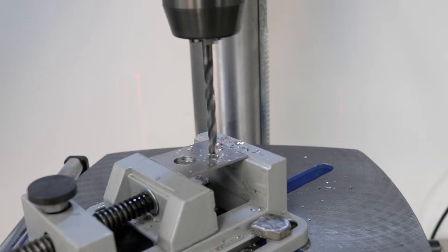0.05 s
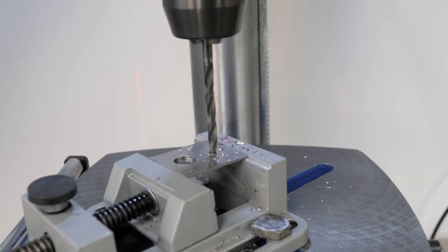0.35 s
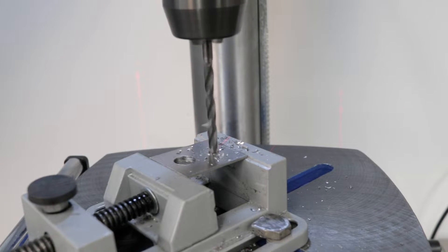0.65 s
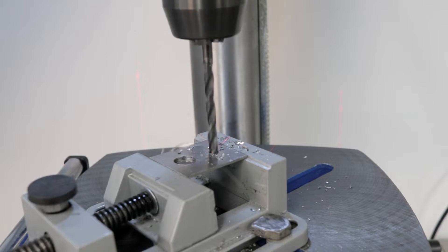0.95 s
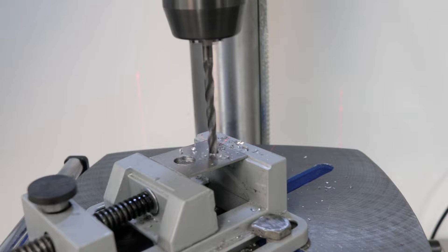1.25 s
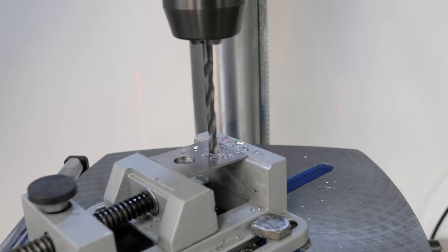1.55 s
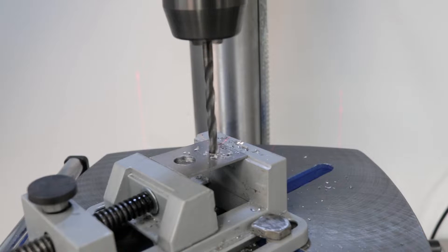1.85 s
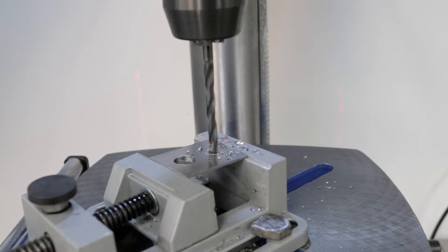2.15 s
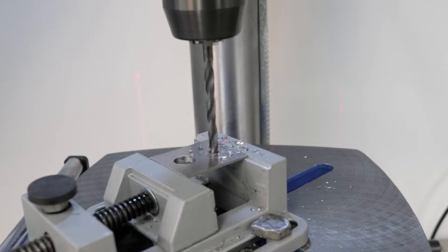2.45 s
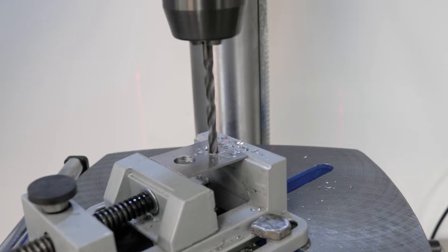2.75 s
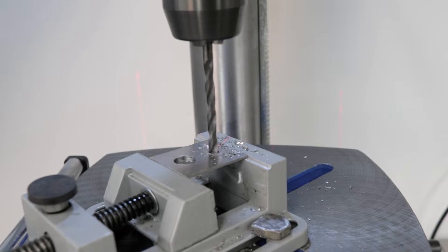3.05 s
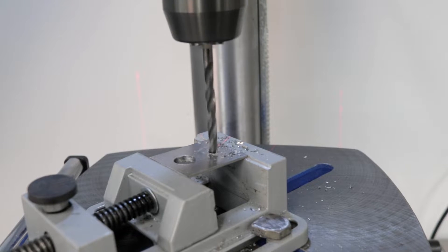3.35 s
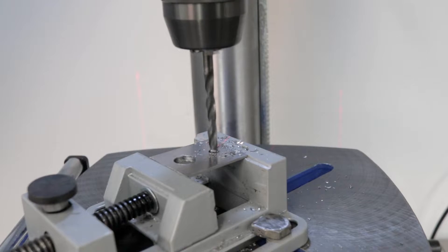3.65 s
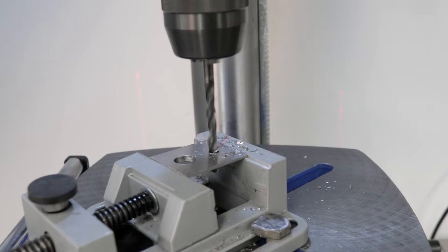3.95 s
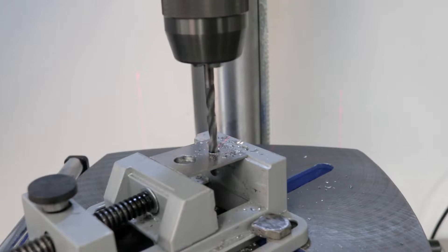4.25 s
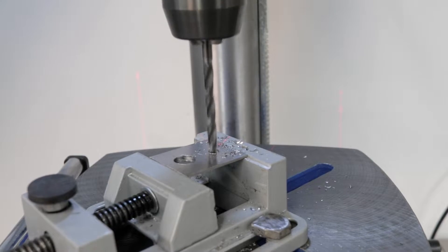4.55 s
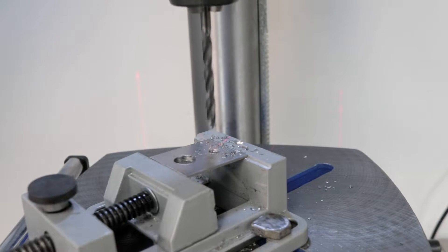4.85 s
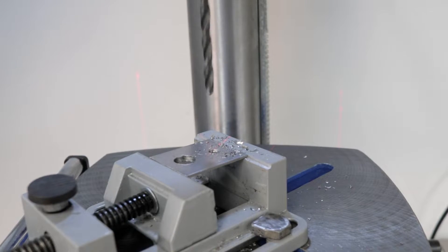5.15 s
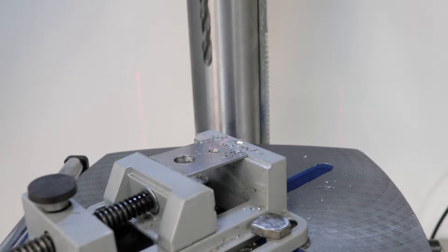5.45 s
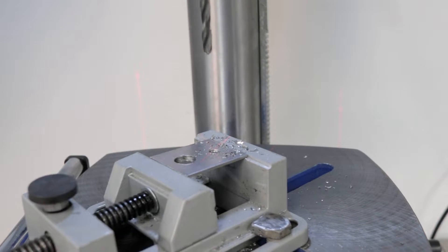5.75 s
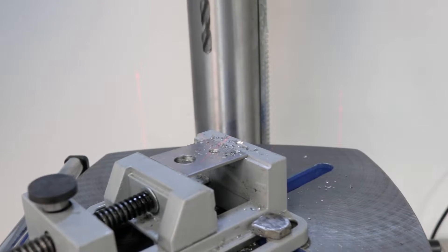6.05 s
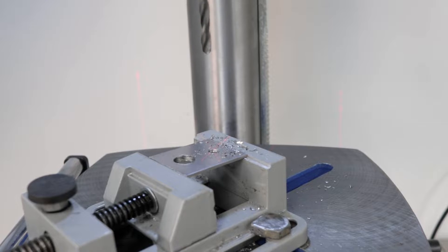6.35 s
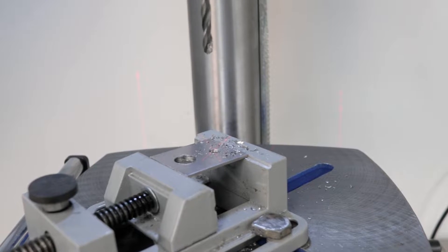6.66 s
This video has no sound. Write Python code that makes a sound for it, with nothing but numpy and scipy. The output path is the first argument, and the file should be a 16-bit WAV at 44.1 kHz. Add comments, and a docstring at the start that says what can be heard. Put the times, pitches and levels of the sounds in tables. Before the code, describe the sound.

In a small workshop, a bench drill runs with a steady hum and a throbbing belt, close to the microphone. The bit ticks lightly on a steel plate, then bites with a harsh, ringing scrape and sharp snaps of breaking chips. The cutting eases into short, high squeaks and stops as the bit lifts out. The motor runs on alone until a switch clacks at the very end.

```python
"""A belt-driven bench drill bores a steel plate in a vice; small workshop, one microphone close by.
Over the hum of the motor and the throb of the belt, the tip ticks and skates on the plate, then bites.
The bit scrapes, shaves flakes and snaps off chips, about one a turn at full feed.
As the feed eases it sticks and slips in the hole, squeaking, and is lifted out.
The motor runs free; at the very end the switch clacks and it starts to run down."""
import sys
import numpy as np
from scipy import signal
from scipy.fft import rfft, irfft
from scipy.io import wavfile
from scipy.ndimage import uniform_filter1d, map_coordinates

SR = 44100
rng = np.random.default_rng(int(sys.argv[2]) if len(sys.argv) > 2 else 0)


def log_audio(samples):
    """Write samples as a 16-bit WAV file to the path given in sys.argv[1]."""
    # one column per channel
    frames = np.atleast_2d(samples).T
    # limit to full scale, then quantise
    limited = np.clip(frames, -1, 1)
    pcm = np.round(limited * 32767).astype(np.int16)
    wavfile.write(sys.argv[1], SR, pcm)


N = 295451
TIME = np.arange(N) / SR
FREQ = np.maximum(np.arange(N // 2 + 1) * SR / N, 1)
SPINDLE_HZ, TOP_HZ = 9.656, 16200
BITE_S, LIP_S = 0.67, 1.727  # the lips first bite; one moment at which a lip passes
EASE_S = (3.35, 3.72)  # over this span the tip stops cutting

# strength of the scrape: t/s, level/dB
SCRAPE_LEVEL = [(0, -61.5), (.4, -61.5), (.55, -55.5), (.7, -52), (1.0, -48), (1.17, -41), (1.6, -41),
                (2.35, -42.5), (2.52, -40), (2.68, -43.5), (2.93, -39), (3.2, -47.5), (3.4, -46),
                (3.6, -42.5), (3.8, -46), (4.0, -53.5), (4.45, -45), (4.6, -47.5), (4.67, -53), (4.71, -57),
                (4.85, -67)]
# pressure on the feed lever: t/s, pressure/0-1
FEED = [(0, 0.52), (.6, 0.03), (1.1, 0.84), (1.6, 0.93), (2.9, 1), (3.3, 1), (3.72, 0.27), (4.8, 0.01)]
# modes of the bit with its tip engaged: f/Hz, width/Hz, gain/dB
TIP_MODES = [(2367, 60, 5.5), (2530, 70, 5), (2831, 75, 5.5), (3332, 32, 2.5), (3696, 120, 4.5),
             (3913, 34, 7.5), (4220, 50, 2.5), (4596, 140, -0.5), (5670, 50, -5), (6150, 120, 3),
             (6440, 60, -6), (6980, 120, -1), (7420, 92, -1), (9630, 130, -4), (9920, 200, 1),
             (11370, 80, -1.5), (11900, 300, -14)]
# the same with a loose flake ringing in the flute
FLAKE_MODES = TIP_MODES + [(7240, 500, 3.5)]
# modes of the bit with its tip free and its flanks rubbing: f/Hz, width/Hz, gain/dB
FLANK_MODES = [(2378, 49, -6), (2710, 52, -9.5), (2863, 70, -6), (3300, 100, -12.5), (4235, 130, -7.5),
               (4670, 110, -11.5), (5200, 90, -12.5), (6015, 60, -6), (6500, 130, -3.5), (7400, 89, -1.5),
               (8950, 160, -10.5), (9600, 300, -14.5), (10400, 200, -14), (11100, 170, -6.5),
               (12150, 100, -13), (12950, 120, -17.5)]
# spectrum of tearing steel: f/Hz, gain/dB
TEAR_SPECTRUM = [(100, -47.5), (450, 5), (1100, -6), (1630, -1.5), (2050, -6), (2700, -2.5), (3750, -1),
                 (5400, -3.5), (7200, 0), (8700, -5.5), (9900, -5), (12300, -5), (13500, -11), (15000, -14),
                 (16500, -28)]


def scraping(hush_s=(4.46, 4.8), lift_s=(4.695, 4.8)):
    """The lips tear the steel without pause; with less feed the flanks take over and only rub."""
    # pitch at which the flutes sing in the hole: t/s, f/Hz
    flute_pitch = [(3.7, 5150), (3.92, 4780), (4.14, 4550), (4.25, 4400), (4.35, 4250), (4.46, 4370)]
    # treble of the scrape against its body: t/s, level/dB
    treble_level = [(0, -1.5), (.6, -5.5), (1.6, -9), (2.3, -15), (2.9, -9), (3.25, -22), (3.42, -17),
                    (3.56, -14), (3.85, -5.5), (4.05, -16), (4.6, -16)]
    rub = ramp(EASE_S)
    grit = crackle(spread_db=2.5)
    sing = walk(500) * np.sin(2 * np.pi * np.cumsum(curve(flute_pitch) + 120 * walk(300)) / SR)
    flanks = shape(grit, resonances(FLANK_MODES)) + undb(-6.5) * sing * (1 - ramp(hush_s))
    tip = shape(grit, resonances(TIP_MODES))
    ring = ((1 - rub) * tip + rub * flanks) / np.hypot(1 - rub, rub)
    ring = sway(ring, share=.009, rate=45)  # the turning contact keeps retuning the bit
    rasp = shape(crackle(spread_db=7), heavy_cut(plate_db=1))
    tearing = undb(-14 + 17 * curve(FEED))
    bite = undb(2.4 * walk(70) + 0.81 * walk(400))  # the lips grip and let go unevenly
    body, treble = split(bite * (ring + tearing * rasp) / np.hypot(1, tearing), hz=7600)
    scrape = unit(body) + unit(treble) * undb(curve(treble_level))
    frame = resonances([(123, 14, 1), (141, 15, -0.5), (165, 18, -11)])
    rumble = shape(rng.standard_normal(N), frame, size=8192)
    rumble *= (1 - rub) * undb(-18.5) + rub * undb(-26.5)
    return (1 - ramp(lift_s)) * undb(curve(SCRAPE_LEVEL)) * (scrape + rumble)


def ticks_and_chips(spread_db=6, hard_db=-36, crack_s=0.00056):
    """Light ringing ticks as the tip first touches the plate; once it bites, chips tear or snap off."""
    # first-contact ticks, then chips breaking: t/s, level/dB, treble tilt/dB, decay/s, snap/0-1
    pulses = [(0.082, -53, -2, .005, .1), (0.219, -57, -11, .005, .1), (0.318, -56.5, -2, 0.0042, .1),
              (0.395, -52, 10, 0.0044, .1), (0.4439, -43, 8, 0.0061, 0.2), (0.49, -46, -2, 0.0051, 0.2),
              (0.59, -48.5, -6, 0.0067, .1), (0.626, -47, -3, 0.0038, .1), (0.6578, -42.5, 4, 0.0033, 0.3),
              (0.691, -41, -6, 0.0072, 0.2), (0.787, -49, -11, 0.0059, .1), (0.8957, -37.5, -5.5, 0.002, 0),
              (0.9666, -38, 0.5, 0.0043, .3), (0.9974, -33, -1.5, 0.0061, .1), (1.071, -34, 4.5, 0.004, .1),
              (1.102, -29.5, -4, 0.0067, 0.5), (1.1116, -31, 5, 0.003, 0.7), (1.176, -38.5, 0, .004, .2),
              (1.2094, -26.5, 6, 0.0034, 0.54), (1.218, -34, 5.5, 0.0022, .6),
              (1.3159, -25, 4, 0.0029, 0.53), (1.419, -27, 2.5, 0.0026, 0.3), (1.52, -26, 4.5, 0.0026, 0.6),
              (1.5253, -27, 4.5, 0.0028, .7), (1.6205, -29, 3, 0.004, .1), (1.628, -33, 1.5, 0.0016, .8),
              (1.7265, -26.5, 4.5, 0.0017, 0.6), (1.7289, -23.5, 9.5, 0.0023, .8),
              (1.8309, -31.5, 3, 0.0078, 0.77), (1.9376, -28.5, 6, 0.0033, .4),
              (1.9832, -32, -0.5, 0.0038, 0.6), (2.0899, -27, 9.5, 0.0011, 1), (2.0949, -33, 5, 0.0012, .8),
              (2.1026, -28, 6.5, 0.001, .8), (2.142, -28.5, 2, 0.0062, 0.36),
              (2.3013, -42.5, 13.5, 0.0027, 0.4), (2.35, -41, 7.5, 0.0036, .1),
              (2.4427, -33.5, 13.5, 0.0013, .8), (2.4492, -26.5, 6.5, 0.003, .9),
              (2.4564, -28, 5.5, 0.0027, .6), (2.5005, -29.5, 5.5, 0.0018, 0.9), (2.505, -30, 5, 0.002, .7),
              (2.617, -34.5, 2, 0.0037, 0.2), (2.66, -38.5, -6, 0.0041, 0.25),
              (2.707, -42.5, 4.5, 0.0026, 0.3), (2.746, -23.5, 8, 0.0046, 0.5),
              (2.863, -25, 9, 0.0019, 0.9), (2.9325, -36, 17, 0.002, 1), (2.965, -35, -5, 0.0024, .1),
              (3.018, -35.5, -3, 0.0054, 0.64), (3.039, -47, 4, 0.0026, .5), (3.0642, -37, 3, 0.0033, .4),
              (3.0882, -37, 2, 0.0025, .7), (3.1193, -38, -2, 0.0059, 0.4), (3.1907, -43, 3, 0.0028, .2),
              (3.2287, -35.5, -4.5, 0.0049, 0.3), (3.3284, -29, 4.5, 0.0044, 0.38),
              (3.4442, -39.5, -9, 0.0043, 0.1), (3.4781, -31.5, 0, 0.0072, 0.1),
              (3.5033, -36, 12, 0.0023, .6), (3.53, -39, 1, 0.0038, .3), (3.58, -38.5, 12, 0.0048, 0.2),
              (3.6, -39, 2, 0.0044, .2), (4.0826, -40, 7, 0.0032, 0.64)]
    light, hard = np.zeros((2, N))
    for s, db, tilt_db, decay, snap in pulses:
        volley = burst(decay, spread_db, rise=decay * (1 - snap))
        crack = snap * burst(crack_s, spread_db)
        low, high = split((volley + crack) / np.hypot(1, snap / 2), hz=6000)
        tilt = undb(tilt_db)
        blow = undb(db) * (low + tilt * high) / np.hypot(1, tilt)
        hard_share = 1 / (1 + undb(hard_db - db))  # light blows ring the bit, hard ones crack broadly
        add(light, s, (1 - hard_share) * blow)
        add(hard, s, hard_share * blow)
    hard = split(hard, hz=950)[1]  # the blows are too small to shake the frame
    ring = shape(light, resonances(FLAKE_MODES)) + shape(hard, heavy_cut(plate_db=3.5))
    return sway(ring, share=.006, rate=30)  # no two blows meet the bit at the same spot


def heavy_cut(plate_db):
    """Gain at every frequency of a deep cut: broad tearing plus the ring of plate and bit."""
    # plate, vice and bit ringing together under heavy feed: f/Hz, width/Hz, gain/dB
    plate_modes = [(1584, 40, 5), (1682, 36, 7.5), (2400, 90, -2.5), (2880, 140, 0), (3360, 60, -3),
                   (3670, 120, 3.5), (3925, 60, 5), (4630, 90, -2), (5700, 60, -7), (6120, 80, -2.5),
                   (6410, 55, -5), (6950, 110, 3), (7410, 90, 2), (8350, 130, -5), (9530, 140, -2.5),
                   (9950, 200, -4), (11300, 110, -4), (11850, 230, -4), (12600, 200, -7)]
    return np.hypot(unit(colour(TEAR_SPECTRUM)), undb(plate_db) * unit(resonances(plate_modes)))


def flakes(jitter_s=0.0043):
    """Each of the two lips shaves off a flake once a turn; they stand out most under light feed."""
    level_db = curve(SCRAPE_LEVEL) - 1 - 5.5 * curve(FEED)
    half_turn_s = .5 / SPINDLE_HZ
    passes = np.arange(LIP_S % half_turn_s, EASE_S[1], half_turn_s)
    blows = np.zeros(N)
    for s, (late, softer_db) in zip(passes, rng.standard_normal((len(passes), 2))):
        if s > BITE_S:
            flake = burst(decay=0.0046, spread_db=5, rise=.002)
            add(blows, s + jitter_s * late, undb(level_db[int(s * SR)] - softer_db) * flake)
    return sway(shape(blows, resonances(FLAKE_MODES)), share=.005, rate=25)


def crumbs(per_s=20, spread_db=4):
    """Tiny crumbs break off at random between the chips, as strong as the cut is deep."""
    level_db = curve(SCRAPE_LEVEL) - 10
    blows = np.zeros(N)
    gaps, sizes = rng.random((400, 2)).T
    for s, size in zip(np.cumsum(-np.log(gaps)) / per_s, 2 * sizes - 1):
        if s < EASE_S[1]:
            crumb = burst(decay=0.0023, spread_db=5.6)
            add(blows, s, undb(level_db[int(s * SR)] + spread_db * size) * crumb)
    return shape(blows, resonances(FLAKE_MODES))


def squeaks(wobble=0.15, stutter_db=7, flute_hz=4100):
    """The bit sticks and slips in short chirps; the rough ones wobble in pitch, stutter and rasp."""
    # slips in the hole: t/s, level/dB, f/Hz, length/s, roughness/0-1, glide/octaves
    slips = [(3.314, -51, 467, 0.096, 0.42, 0.23), (3.47, -44.5, 584, 0.028, 0.32, 0.15),
             (3.503, -47, 618, 0.07, 0.53, 0.15), (3.485, -41.5, 1597, 0.065, 0.25, 0.02),
             (2.755, -45.5, 12500, .07, .3, 0), (3.578, -39, 10200, .009, .1, 0),
             (3.652, -38, 7380, .008, 0.1, 0.1), (3.6826, -22.5, 6740, 0.0052, 0.2, -0.02),
             (3.689, -32, 6640, 0.0049, 0.2, 0.064), (3.709, -40.5, 4766, 0.016, 0.65, -0.013),
             (3.714, -35, 6200, 0.009, 0.4, -0.2), (3.762, -43, 4300, 0.0078, 0, 0.061),
             (3.81, -38, 5200, 0.012, 0.04, 0.12), (3.816, -37, 5690, 0.015, 0.3, 0.16),
             (3.82, -30.5, 6390, 0.01, 0.42, 0.12), (3.918, -37.5, 4840, 0.0087, 0.22, 0.2),
             (4.029, -43, 4520, 0.0089, 0.16, 0.18), (4.038, -33.5, 6780, 0.0084, 0.42, 0.093),
             (4.084, -47, 1464, 0.013, 0.18, 0.082), (4.134, -35, 4570, 0.021, 0.24, 0.013),
             (4.188, -46, 1520, 0.019, 0.2, 0.017), (4.238, -35, 3800, 0.0083, 0.2, 0.097),
             (4.241, -33, 3930, 0.011, 0.3, 0.05), (4.245, -36.5, 12100, 0.012, 0.15, 0.016),
             (4.338, -33, 3740, 0.0074, 0.1, 0.026), (4.343, -32, 3970, 0.011, 0.42, 0.11),
             (4.344, -48.5, 1230, 0.041, 0.23, 0.028), (4.373, -39, 7000, 0.0043, 0, 0.0042),
             (4.389, -38.5, 6100, 0.0068, 0.2, -0.1), (4.390, -37, 2383, 0.015, 0.03, -0.059),
             (4.437, -34.5, 4440, 0.007, 0.32, 0.037), (4.442, -36.5, 4130, 0.014, 0.71, 0.0022),
             (4.45, -34, 6800, 0.0053, 0.1, 0.35), (4.508, -25, 6540, 0.0042, 0.09, 0.11),
             (4.534, -40, 2677, 0.014, 0.45, -0.22), (4.535, -37, 7130, 0.0091, 0.38, 0.091),
             (4.574, -39, 7220, 0.0086, .15, .08), (4.595, -37, 6590, 0.01, 0.05, -0.078),
             (4.616, -47, 2600, 0.014, 0.33, -0.3), (4.644, -41, 7020, 0.0074, 0.37, .15),
             (4.661, -41, 6950, 0.0059, 0, -0.16), (4.663, -46, 2420, 0.0096, 0, -0.12)]
    squeal, grit = np.zeros((2, N))
    for s, db, hz, length, rough, glide in slips:
        count = int(length * SR)
        along = np.linspace(0, 1, count)
        stutter = undb(stutter_db * rough * walk(620, count))
        swell = undb(db) * unit(np.sin(np.pi * along) * stutter)
        pitch = hz * 2 ** (glide * (along - .5)) * (1 + wobble * rough * walk(hz / 2, count))
        phase = 2 * np.pi * np.cumsum(pitch) / SR
        second = np.sin(2 * phase) * (2 * hz < TOP_HZ)
        third = undb(-10) * np.sin(3 * phase) * (3 * hz < TOP_HZ)
        overtone_db = -1 - 23 * abs(np.log2(hz / flute_hz))  # strongest near the pitch of the flutes
        add(squeal, s, swell * (np.sin(phase) + undb(overtone_db) * (second + third)))
        add(grit, s, swell * rough * rng.standard_normal(count))
    rubbing = np.hypot(unit(colour(TEAR_SPECTRUM)) / 2, unit(resonances(FLANK_MODES)))
    squeal += undb(-6) * shape(grit, rubbing)
    return split(squeal, hz=12600)[0]  # the squeaks stop short of the highest treble


def skating():
    """Before the lips bite, the tip skates on the plate and the bit rings, swelling with each turn."""
    # modes of the bit with only its point on the plate: f/Hz, width/Hz, gain/dB
    skate_modes = [(3780, 70, 1), (3340, 38, -20), (5900, 45, -15), (10060, 88, -17)]
    swing_db = walk(31.5) + 2 * np.cos(2 * np.pi * SPINDLE_HZ * (TIME - LIP_S))
    ring = shape(crackle(spread_db=9), resonances(skate_modes))
    return ring * undb(-60 + swing_db) * (1 - ramp((BITE_S / 2, BITE_S)))


def motor(off_s=6.577, home_s=(5.78, 5.97), sag=.005, run_down_per_s=1.28):
    """Hum, whine, belt and bearings follow the load, swell as the quill slides home, then coast."""
    # magnetic hum near multiples of the mains: f/Hz, level/dB
    hum_lines = [(98.9, -26), (50, -38), (202.5, -23), (601, -21.5), (699.5, -8.5), (799.6, -0.5),
                 (901, -15)]
    # rotor slot and bearing tones: f/Hz, level/dB
    whine_lines = [(471.7, -12.5), (490, -7), (595, -14), (743, -6.5), (818.7, -8), (844, -4.5),
                   (867.5, -9), (1043.7, 0), (1143.7, -3.5)]
    # tones that stand out when the motor runs free: f/Hz, level/dB
    idle_lines = [(346.5, 1), (769.8, 3), (943, -1.5), (1346, -16), (1486, -21), (1687.4, -1),
                  (1787.4, -10), (1887.4, -2), (2331, -11), (2433, -17.5)]
    # spectrum of bearing and fan noise: f/Hz, gain/dB
    air_spectrum = [(18, -82.5), (30, -45), (80, -33.5), (120, -21), (160, -25.5), (227, -15), (295, -11),
                    (394, -10), (649, -12), (801, -7.5), (866, -18), (1070, -15.5), (1250, -22),
                    (1860, -24.5), (2120, -30.5), (3980, -45.5), (6380, -41), (16000, -58)]
    # groan of belt and pulleys with the power off: f/Hz at full speed, level/dB
    groan_lines = [(385, -1), (505, 3), (545, -11)]
    load = (1 - ramp(EASE_S)) * (.6 + .4 * curve(FEED))
    home = ramp(home_s)
    coasting_s = np.maximum(TIME - off_s, 0)
    clock = np.cumsum(1 - sag * load - run_down_per_s * coasting_s) / SR  # slows with the shaft
    power = np.exp(-coasting_s / .035)

    def gain(idle_db, load_db, home_db):
        """Gain from the idle level and its changes at full load and with the quill home."""
        return undb(idle_db + load_db * load + home_db * home)

    hum = tones(hum_lines, TIME, waver_db=0, drift=0.095) * undb(0.91 * load * walk(35))
    hum *= gain(idle_db=-52.5, load_db=2, home_db=2)
    whine = tones(whine_lines, clock, waver_db=1.3, drift=0.4) * gain(-59, 0.5, 4)
    idle = tones(idle_lines, clock, waver_db=1.5, drift=0.2) * gain(-64.5, -16, 1.5)
    drone = belt(clock) * gain(-46.5, -4, 1.5) * np.exp(-coasting_s / .09)
    buzz_db = 2 * np.sin(2 * np.pi * 98.9 * TIME) * power  # the casing buzzes with the magnetic pull
    air = shape(bearings(clock), colour(air_spectrum)) * gain(-53.5, 2, 3) * undb(buzz_db + walk(25))
    groan = tones(groan_lines, clock, waver_db=2, drift=.4) * undb(-57) * (1 - power)
    return drone + (hum + whine + idle) * power + groan + air


def belt(clock, lap_hz=7.95, drone_hz=297.5, joint_s=4.05):
    """The belt joint swings the drone once a lap, making sidebands; the frame rings just below it."""
    lap = 2 * np.pi * lap_hz * (clock - np.interp(joint_s, TIME, clock))
    phase = 2 * np.pi * drone_hz * clock
    sidebands_db = {-2: -10, -1: -8.5, 0: 0, 1: -14}
    drone = sum(undb(db) * np.sin(phase + k * lap + 0.55 * walk(5)) for k, db in sidebands_db.items())
    frame = shape(rng.standard_normal(N), resonances([(291.6, 8.7, 0.0051)]), size=8192)
    uneven = undb(1.35 * walk(3.7))
    return unit((unit(drone) + undb(-5) * frame) * uneven)


def bearings(clock, shaft_hz=24.82, size=128):
    """Bearing and fan noise; part of its low range comes round again with every turn of the shaft."""
    low, high = split(rng.standard_normal(N), hz=1500)
    one_turn = rng.standard_normal(size)
    repeat = map_coordinates(one_turn, [clock * shaft_hz * size % size], order=3, mode="grid-wrap")
    return high + undb(-4) * low + undb(-17) * repeat


def clacks():
    """The feed lever knocks faintly, then the switch clacks; both rattle the head casing."""
    # blows of lever and switch: t/s, level/dB, decay/s
    knocks = [(4.952, -78, 0.012), (5.19, -66, .03), (6.537, -56, 0.039), (6.573, -52, 0.0024),
              (6.5761, -39.5, 0.0031), (6.601, -48, 0.074)]
    # modes of the head casing: f/Hz, width/Hz, gain/dB
    casing_modes = [(391.4, 61, 6.5), (474, 54, -1), (730, 77, 4), (1310, 390, -3), (2080, 72, 2),
                    (2540, 330, 0), (3200, 200, 0), (3680, 92, -8), (4188, 190, -12), (5040, 410, -6),
                    (5860, 300, -4), (7600, 390, -4.5), (9700, 1000, -13.5), (12800, 2100, -21)]
    blows = np.zeros(N)
    for s, db, decay in knocks:
        add(blows, s, undb(db) * burst(decay, spread_db=1, window=0.0097))
    return shape(blows, resonances(casing_modes))


def workshop(x, near_db=-4, near_t60=0.074, far_db=-11, far_t60=0.67):
    """The direct sound, quick reflections from table and wall, then the short tail of the room."""
    t = TIME[:SR // 2]
    response = np.zeros(len(t))
    for db, t60 in ((near_db, near_t60), (far_db, far_t60)):
        tail = rng.standard_normal(len(t)) * np.exp(-np.log(1000) * t / t60) * (t > .002)
        response += undb(db) * tail / np.linalg.norm(tail)
    response[0] = 1
    return signal.oaconvolve(x, response / np.linalg.norm(response))[:N]


def crackle(spread_db, count=N):
    """Dense tiny clicks of very unequal size."""
    noise, size = rng.standard_normal((2, count))
    return unit(noise * undb(spread_db * np.clip(size, -2, 2)))


def burst(decay, spread_db, rise=0, window=0.029):
    """A volley of clicks that builds and dies, with the energy of `window` seconds at rms 1."""
    t = TIME[:SR // 5]
    envelope = np.exp(-t / max(decay, 1e-3)) * (1 - np.exp(-t / max(rise, 1e-5)))
    volley = crackle(spread_db, len(t)) * envelope
    return volley * np.sqrt(window * SR) / np.linalg.norm(volley)


def tones(lines, clock, waver_db, drift):
    """Partials on a common clock, each wavering in level and drifting in phase (radians)."""
    total = np.zeros(N)
    for hz, db in lines:
        peak = np.sqrt(2) * undb(db + waver_db * walk(9))
        total += peak * np.sin(2 * np.pi * (hz * clock + rng.random()) + drift * walk(5))
    return total


def colour(points):
    """Gain at every frequency from (f/Hz, gain/dB) points."""
    hz, db = np.transpose(points)
    return undb(np.interp(np.log(FREQ), np.log(hz), db))


def resonances(modes):
    """Gain at every frequency of a set of (f/Hz, width/Hz, gain/dB) modes."""
    return np.sqrt(sum(undb(2 * db) / (1 + ((FREQ - hz) / width) ** 2) ** 2 for hz, width, db in modes))


def shape(x, gain, size=2048):
    """Pass a sound through a causal body with the given gains; white noise keeps its level."""
    hz = np.arange(size + 1) * SR / (2 * size)
    cepstrum = irfft(np.log(np.interp(hz, FREQ, gain) + 1e-5))
    cepstrum[1:size] *= 2  # fold to minimum phase
    cepstrum[size + 1:] = 0
    ring = irfft(np.exp(rfft(cepstrum)))[:size]
    return signal.oaconvolve(x, ring / np.linalg.norm(ring))[:N]


def sway(x, share, rate):
    """Let all the resonances of a sound slide up and down together."""
    slip = signal.lfilter([1], [1, -np.exp(-rate / SR)], share * walk(rate))
    return map_coordinates(x, [np.arange(N) + slip], order=3, mode="nearest")


def split(x, hz):
    """The parts below and above a frequency."""
    return [signal.sosfilt(signal.butter(3, hz, kind, fs=SR, output="sos"), x)
            for kind in ("low", "high")]


def walk(rate, count=N):
    """Smooth random wander of spread near 1, with `rate` steps a second."""
    step = max(int(SR / rate), 1)
    held = np.repeat(rng.standard_normal(count // step + 1), step)
    return np.sqrt(2) * uniform_filter1d(held, step)[:count]


def curve(points):
    """A signal in time through (t/s, value) points."""
    return np.interp(TIME, *np.transpose(points))


def ramp(span):
    """A steady move from 0 to 1 between two times."""
    return np.interp(TIME, span, [0, 1])


def add(track, s, sound):
    """Mix a sound in at a time."""
    i = int(s * SR)
    track[i:i + len(sound)] += sound[:N - i]


def undb(db):
    """Decibels to gain."""
    return 10 ** (np.asarray(db) / 20)


def unit(x):
    """Scale to rms 1."""
    return x / np.sqrt(np.mean(x ** 2) + 1e-20)


def scene():
    """At the microphone, in mono: the running machine, and the work and clacks with their room sound."""
    machine = motor()
    work = skating() + scraping() + ticks_and_chips() + flakes() + crumbs() + squeaks()
    return (machine + workshop(work + clacks()))[None]


def record(dry):
    """The recorder cuts the top steeply."""
    return signal.sosfilt(signal.ellip(8, .2, 70, TOP_HZ, fs=SR, output="sos"), dry)


dry = scene()
out = record(dry)
log_audio(out)
```